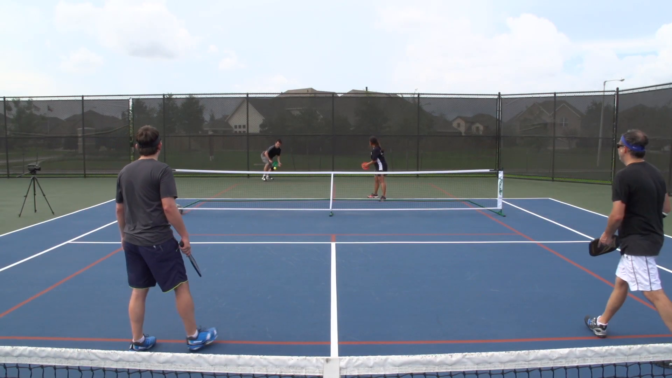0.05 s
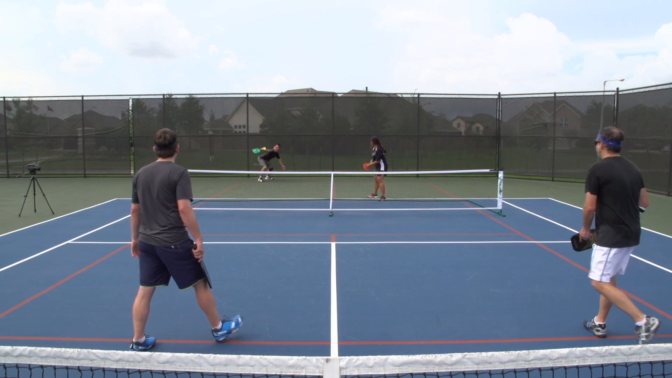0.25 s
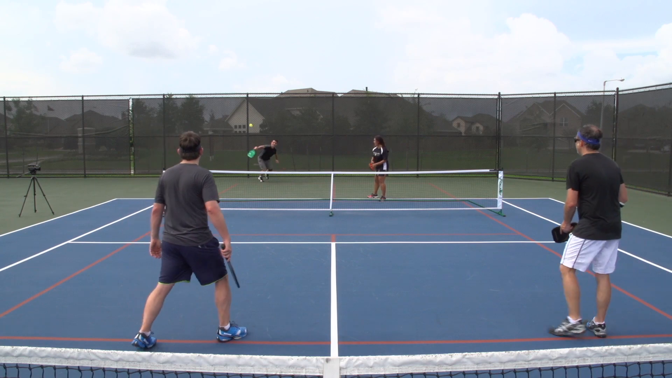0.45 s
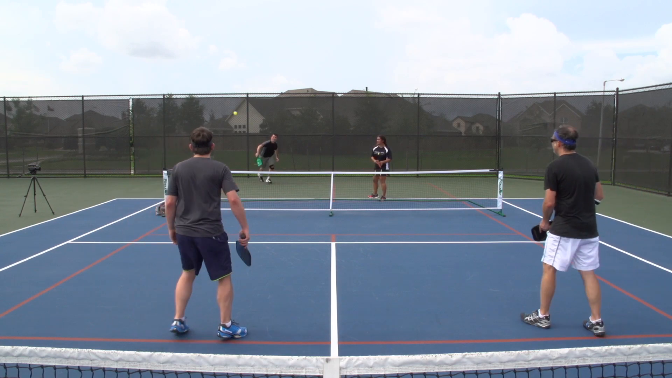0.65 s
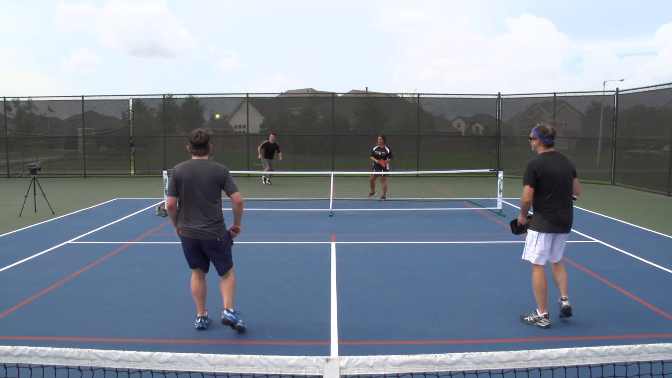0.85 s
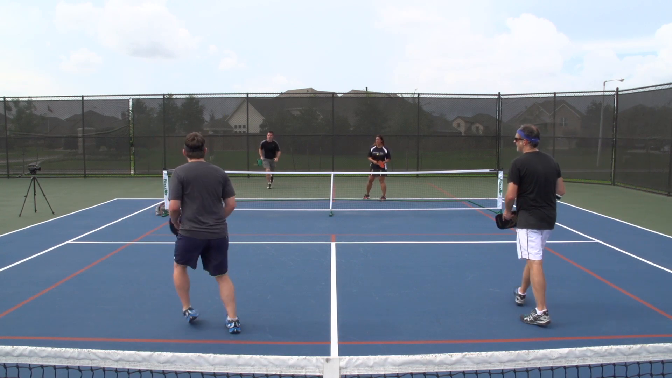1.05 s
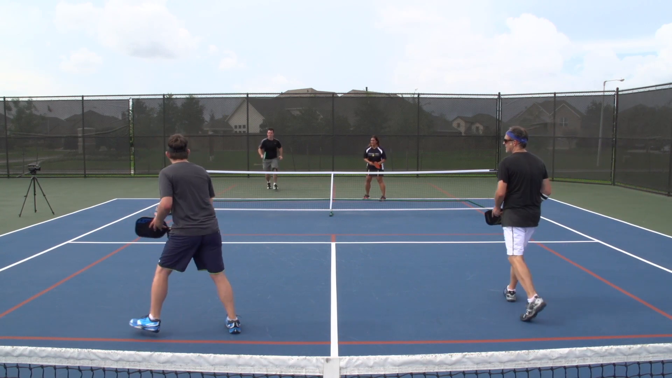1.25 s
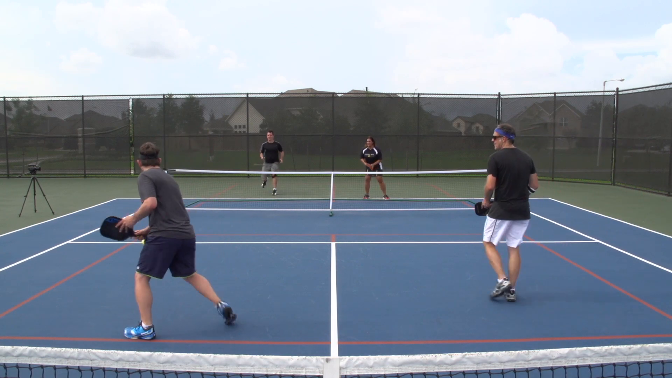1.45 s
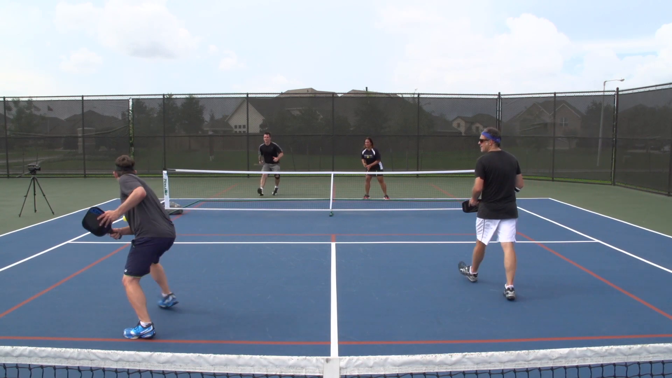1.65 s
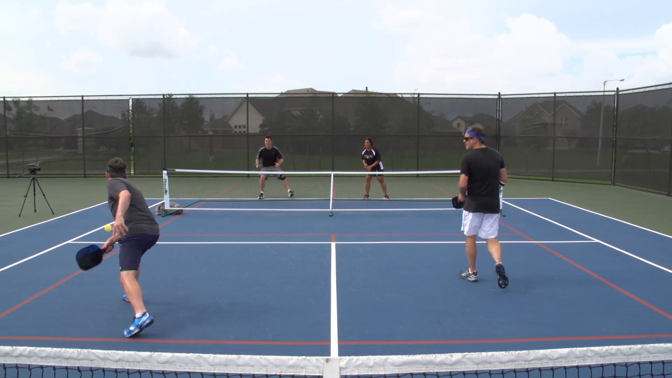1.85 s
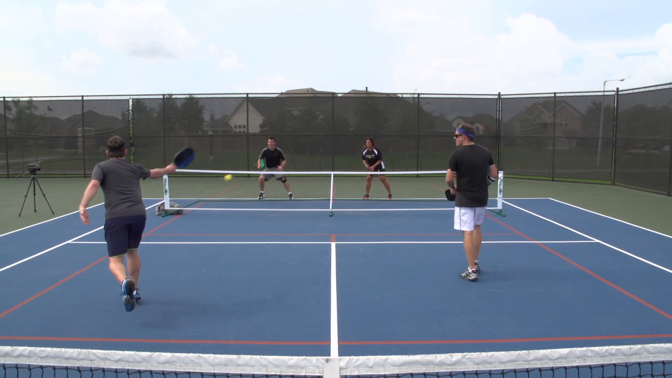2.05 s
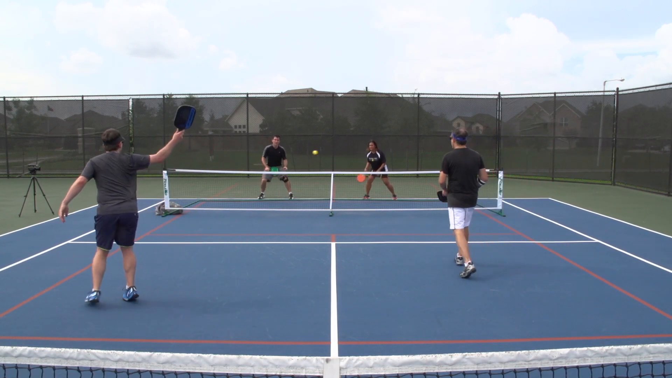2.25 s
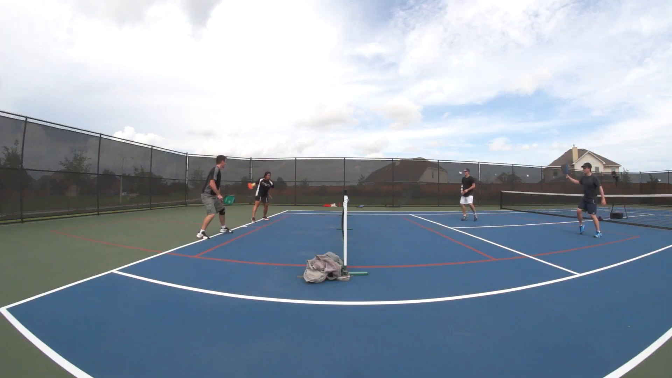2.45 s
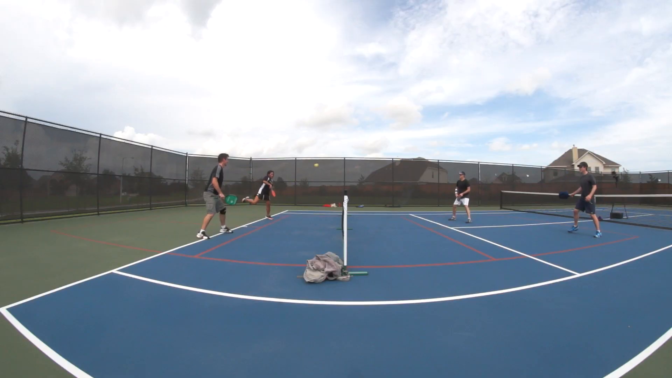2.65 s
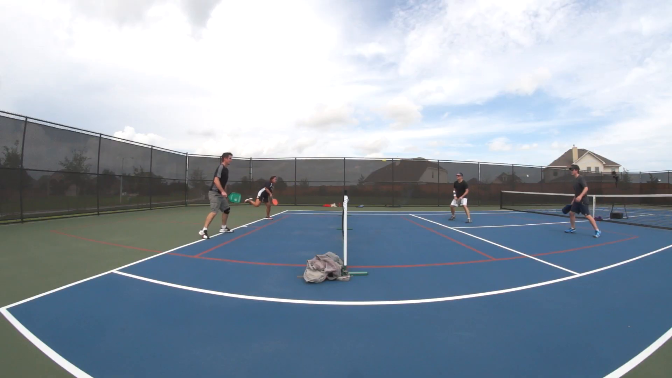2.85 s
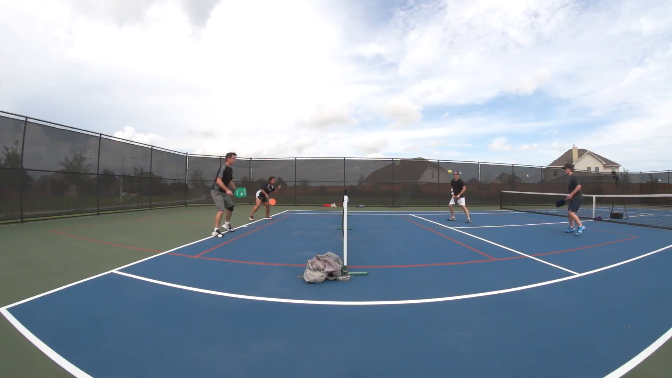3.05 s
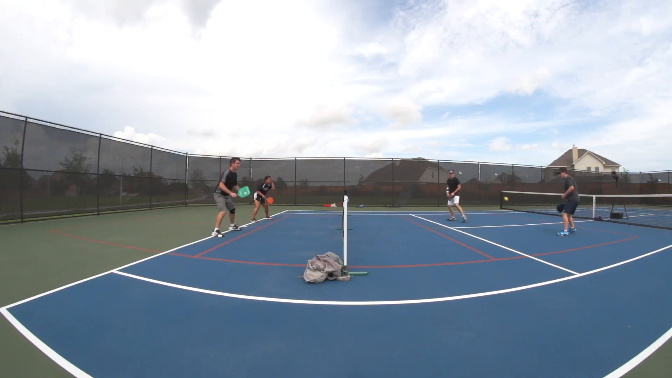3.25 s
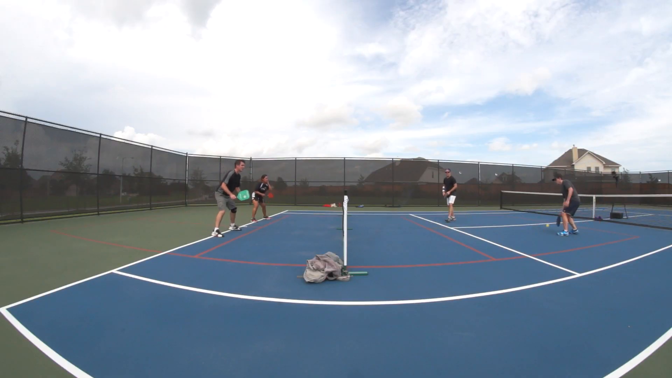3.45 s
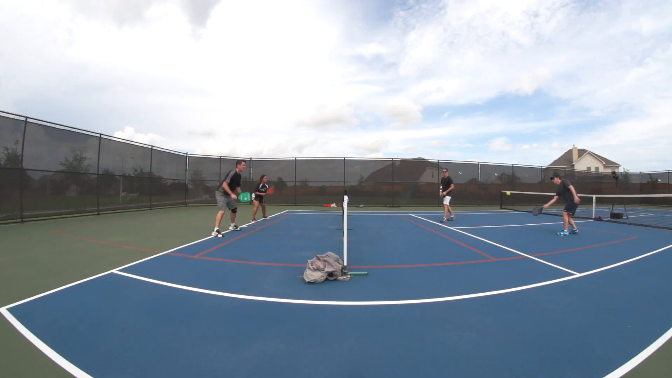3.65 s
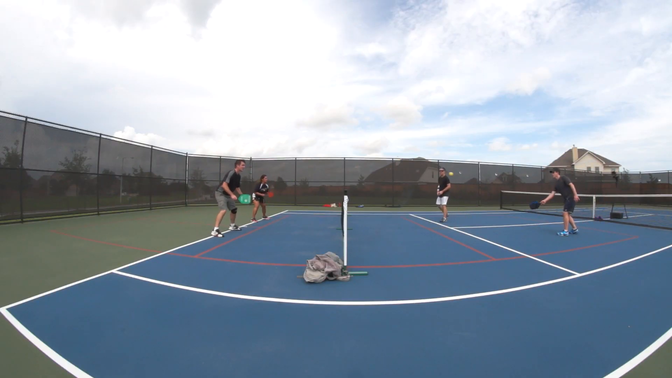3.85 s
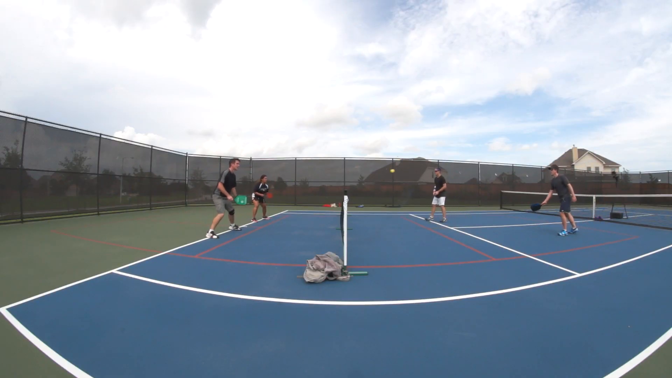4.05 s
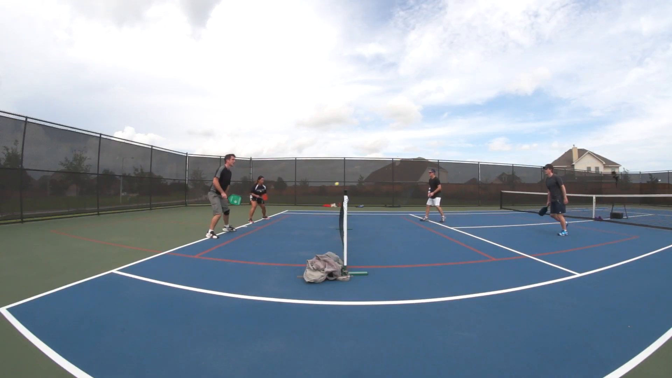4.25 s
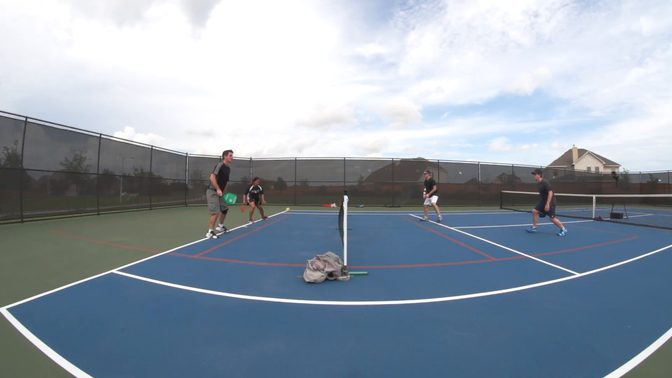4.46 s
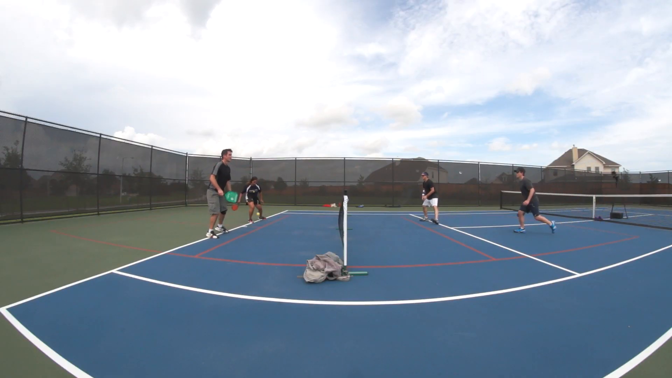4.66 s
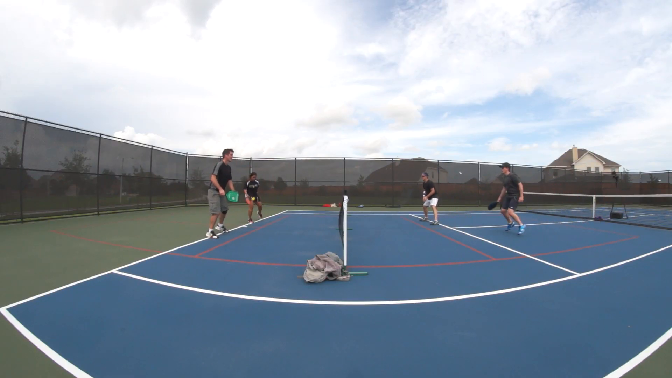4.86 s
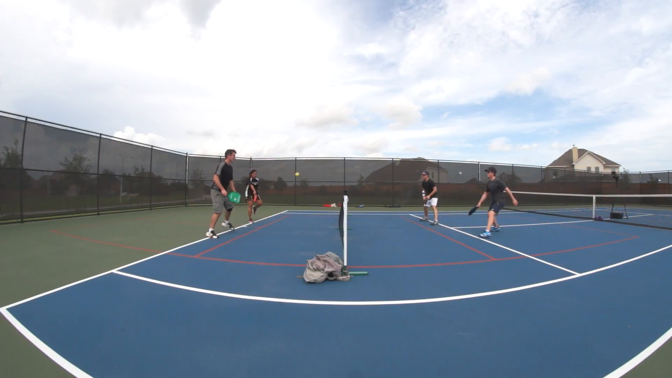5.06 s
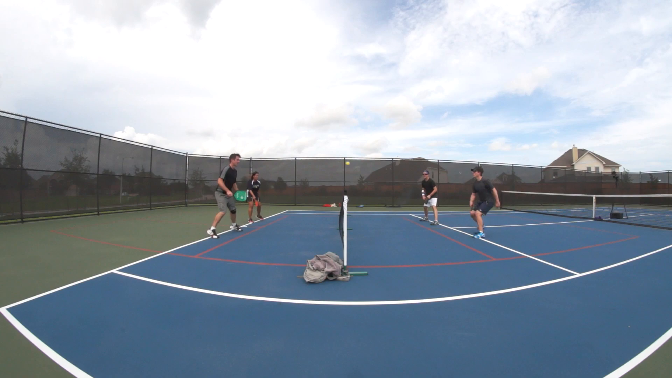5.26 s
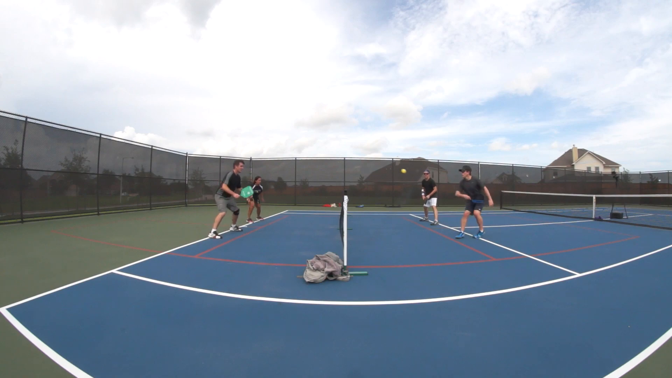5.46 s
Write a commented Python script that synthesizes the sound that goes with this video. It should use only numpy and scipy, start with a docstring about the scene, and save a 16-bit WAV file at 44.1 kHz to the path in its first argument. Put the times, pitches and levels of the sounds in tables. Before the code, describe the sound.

A pickleball rally heard outdoors on a stereo microphone exposed to the wind. One early pop, then a low bounce and shoe scrapes, a bright loud crack near two seconds, then three more pops of varying strength, the last much softer. Short squeaks and scuffs fill the gaps, loudest just after the last shot. Fences return weak echoes above distant traffic and soft hiss.

```python
"""Paddles pop a hollow ball in a pickleball rally on an outdoor hard court: each shot is one push of air,
the brief ring of the paddle face, and a crack of the shell made from decaying modes and a noise burst.
Between the shots, shoes and bounces tap as short decaying tones, soles scuff as grainy noise and squeak
as wavering stick-slip tones, and something brushes softly. Fences and houses return faint echoes.
Wind rumbles on a two-port microphone as gusty low noise, over far traffic, a faint tone and hiss."""
import sys
import numpy as np
from scipy import signal
from scipy.fft import rfft, irfft, next_fast_len
from scipy.io import wavfile
from scipy.ndimage import uniform_filter1d

SR = 44100
rng = np.random.default_rng(int(sys.argv[2]) if len(sys.argv) > 2 else 0)


def bounce(signal):
    """Save signal as a 16-bit WAV file at the path given by the first command-line argument."""
    frames = np.transpose(np.atleast_2d(signal))
    limited = np.clip(frames, -1, 1)
    pcm = np.round(limited * 32767).astype(np.int16)
    wavfile.write(sys.argv[1], SR, pcm)


N = 242805
TIME = np.arange(N) / SR
BLOW = TIME[:SR // 4]  # time base of one struck or scuffed sound
SIDES = np.array([[1], [-1]])  # left, right


def undb(db):
    """Decibels to gain."""
    return 10 ** (np.asarray(db) / 20)


def unit(x):
    """Scale to rms 1."""
    return x / np.sqrt(np.mean(x ** 2))


def noise(points, size):
    """Noise of rms 1 with the colour of (Hz, dB) points."""
    hz, db = np.transpose(points)
    count = next_fast_len(size)
    f = np.maximum(np.fft.rfftfreq(count, 1 / SR), 1)
    colour = undb(np.interp(np.log(f), np.log(hz), db))
    return unit(irfft(rfft(rng.standard_normal(count)) * colour, count)[:size])


def walk(rate, size):
    """Random wander: `rate` normal draws a second, joined by straight lines."""
    return np.interp(TIME[:size] * rate + rng.random(), np.arange(size), rng.standard_normal(size))


def lowpass(x, hz):
    """Gentle loss of treble."""
    return signal.sosfilt(signal.butter(1, min(hz, .45 * SR), fs=SR, output="sos"), x)


def mode(hz, db, t60):
    """One struck resonance, a sine that falls 60 dB in t60 seconds."""
    return undb(db - 60 * BLOW / t60) * np.sin(2 * np.pi * hz * BLOW)


def fade(t, t60):
    """Exponential decay by 60 dB in t60 seconds."""
    return np.exp(-np.log(1000) * t / t60)


def delayed(x, s):
    """The same sound s seconds later."""
    t = TIME[:len(x)]
    return np.interp(t - s, t, x, left=0)


def add(out, s, sound, pan_db=0):
    """Mix a sound into both channels at time s, the left pan_db above the right."""
    start = max(int(s * SR), 0)
    sound = sound[:N - start]
    out[:, start:start + len(sound)] += undb(SIDES * pan_db / 2) * sound


# Paddle shots on the court. Each row: start in seconds, shove in Hz, shove level in dB, face mode in Hz,
# its level in dB, its t60 in seconds, second mode in Hz, its level in dB, shell level in dB, crack level
# in dB, ground bounce lag in seconds, near fence delay in seconds, its level in dB, far fence delay in
# seconds, its level in dB, left minus right in dB, extra level of the sound leaving sideways in dB.
PADDLE_SHOTS = [(0.2728, 600, -17, 1241, -12.5, 0.054, 1200, -25, -42, -26, .00085, 0.027, -27, 0.1217, -24, -3.5, 6.5),
                (2.0321, 411, -17, 1078, -6, 0.015, 1423, -5, -11, -9, .0031, 0.047, -28, 0.12, -29, 1.3, -1),
                (2.6046, 493, -28.5, 1055, -12, 0.021, 1280, -20, -44, -20.5, .0030, 0.034, -18, 0.1104, -27.5, -4, 1),
                (3.6256, 512, -10.5, 1536, -13.5, 0.03, 1670, -35.5, -24.5, -22, .00227, 0.038, -26.5, .1275, -28.5, -2, 0),
                (4.9750, 439.5, -25.5, 1599, -26.5, .019, 1136, -32, -40, -38, .0018, 0.0403, -18.5, 0.112, -26, -3.5, 1)]
# Modes of the ball's shell. Each row: pitch in Hz, level in dB relative to the shot's shell level,
# t60 in seconds.
SHELL_MODES = [(2060, -12.5, .012), (2880, -8.5, 0.016), (3224, 0, 0.011), (4382, -4, .012),
               (5110, -6.5, 0.016), (7500, -13, .008)]


def shots(sideways, second_t60=0.018, ground=0.25, fence_hz=3500):
    """The paddle shoves the air, its face rings like a drum, and the ball's shell cracks."""
    out = np.zeros((2, N))
    shell = sum(mode(hz, db, t60) for hz, db, t60 in SHELL_MODES)
    for s, shove_hz, shove_db, face_hz, face_db, t60, *rest in PADDLE_SHOTS:
        second_hz, second_db, shell_db, crack_db, *place = rest
        lag, near_s, near_db, far_s, far_db, pan_db, sideways_db = place
        # a single cycle: one push and pull during the contact
        shove = undb(shove_db) * np.sin(2 * np.pi * np.minimum(shove_hz * BLOW, 1))
        face = mode(face_hz, face_db, t60) + mode(second_hz, second_db, second_t60)
        pop = shove + face + undb(shell_db) * shell + undb(crack_db) * crack()
        pop = pop + ground * delayed(pop, lag)  # the hard court mirrors it
        slaps = undb(near_db) * delayed(pop, near_s) + undb(far_db) * delayed(pop, far_s)
        heard = pop + lowpass(slaps, fence_hz)
        add(out, s, undb(sideways * sideways_db) * heard, pan_db)
    return out


# Colour of a hard contact. Each row: frequency in Hz, relative level in dB per Hz.
CRACK_COLOUR = [(300, -23), (1200, -0.5), (2800, -3), (5000, -5.5), (9000, -9), (12000, -13.5),
                (16000, -20)]


def crack(t60=0.0071, contact_s=0.00087, tail_db=-22, tail_t60=0.11, patchy_db=5):
    """A bright burst holds for the contact and decays, over its patchy scatter off the ground."""
    size = len(BLOW)
    burst = fade(np.maximum(BLOW - contact_s, 0), t60)
    scatter = undb(tail_db + patchy_db * walk(400, size)) * fade(BLOW, tail_t60)
    return noise(CRACK_COLOUR, size) * (burst + scatter)


# Bounces and footfalls on the court. Each row: start in seconds, thud in Hz, thud level in dB,
# knock in Hz, knock level in dB, click level in dB.
COURT_TAPS = [(1.5009, 402, -26.5, 2058, -39, -38.5), (1.5621, 690, -35, 2840, -40, -27.5),
              (1.5651, 252, -13.5, 692, -20.5, -36.5), (2.7770, 220, -27.5, 600, -55, -40.5),
              (2.8910, 402.8, -61.5, 2513, -51, -50.5), (3.5586, 460.7, -30, 1943, -36.5, -32.5),
              (4.7110, 400, -41, 2090, -41, -38), (5, 402, -54, 2562, -61.5, -49),
              (5.043, 302.5, -39, 783, -38, -34)]


def taps(thud_t60=0.0091, knock_t60=0.013, pan_db=-3.0):
    """Dead, short blows on the hard court: two quickly damped modes and a click."""
    out = np.zeros((2, N))
    for s, thud_hz, thud_db, knock_hz, knock_db, click_db in COURT_TAPS:
        thud = mode(thud_hz, thud_db, thud_t60)
        knock = mode(knock_hz, knock_db, knock_t60)
        click = undb(click_db) * crack(t60=0.0087, contact_s=.0003)
        add(out, s, thud + knock + click, pan_db)
    return out


# Soles dragging over the gritty paint. Each row: start in seconds, length in seconds,
# level in dB before the weight shapes it, reference frequency of the colour in Hz.
SOLE_SCUFFS = [(0.488, 0.17, -58.5, 1670), (0.620, 0.08, -49, 8100), (0.799, 0.027, -36, 4050),
               (0.820, 0.054, -39.5, 3450), (0.949, 0.018, -47.5, 8140), (1.005, 0.057, -36.2, 4284),
               (1.131, 0.029, -55.5, 5920), (1.821, 0.092, -42.5, 3520), (2.403, 0.052, -45.5, 4512),
               (2.59, 0.067, -48, 5030), (2.703, 0.011, -53, 5990), (2.720, 0.061, -37.5, 4460),
               (3.127, 0.034, -52, 4500), (3.26, 0.083, -49, 4460), (3.369, 0.13, -53.5, 4500),
               (3.424, 0.046, -47, 3950), (4.657, 0.041, -52, 8000), (4.697, 0.056, -59.5, 5050),
               (4.874, 0.053, -61, 6000), (4.938, 0.018, -53.5, 6005), (5.042, 0.04, -29, 4030),
               (5.221, 0.049, -46.5, 3950)]
# Colour of the grit. Each row: multiple of the reference frequency, relative level in dB per Hz.
GRIT_COLOUR = [(0.1, -22), (.25, -12), (.5, -2), (1, -3.5), (1.999, -8.5), (3, -14.5), (5, -32)]


def scuffs(grain_db=3, catch_db=2, swell=0.74, tread_db=2.5, trail_db=-16, trail_t60=.17, pan_db=-1.5):
    """A sole rasps over grit, catching and letting go under its weight; loose grit rolls on after."""
    out = np.zeros((2, N))
    multiple, colour = np.transpose(GRIT_COLOUR)
    bands = np.geomspace(multiple[0], multiple[-1], 40)
    size = len(BLOW)
    trail = fade(BLOW, trail_t60)
    for s, length, db, reference_hz in SOLE_SCUFFS:
        tread = np.interp(np.log(bands), np.log(multiple), colour)
        tread = tread + tread_db * rng.standard_normal(len(bands))  # each step rings differently
        rasp = noise(np.column_stack([reference_hz * bands, tread]), size)
        grip = undb(grain_db * walk(2000, size) + catch_db * walk(200, size))
        weight = np.abs(np.sin(np.pi * np.minimum(BLOW / length, 1))) ** swell
        rolling = undb(trail_db) * signal.fftconvolve(weight, trail / trail.sum())[:size]
        add(out, s, undb(db) * unit(rasp * grip) * np.hypot(weight, rolling), pan_db)
    return out


# Rubber soles squeaking. Each row: start in seconds, length in seconds, pitch in Hz,
# glide as a share of the pitch, level in dB before the soft edges, roughness (0 smooth, 1 rough).
SOLE_SQUEAKS = [(0.805, 0.011, 2207, -0.093, -39.5, 0.49), (0.838, 0.027, 1509, 0.023, -30, 0.42),
                (1.032, 0.027, 2204, -0.072, -42, 0.7), (1.036, .016, 3068, -0.049, -48, 1.19),
                (1.877, 0.033, 1633, -0.282, -40.5, 0.78), (2.422, 0.016, 2973, -0.097, -37, 0.1),
                (2.426, 0.011, 2346, -0.029, -37, 0.85), (2.732, 0.027, 2445, 0.047, -28, 0.42),
                (2.763, 0.017, 2586, -0.048, -24, 0.04), (3.146, 0.013, 2927, -0.083, -49, 0.36),
                (3.283, 0.0127, 2880, -0.056, -41.5, 0.24), (3.287, 0.0894, 2355, -.01, -50.5, 0.36),
                (3.313, 0.0167, 2890, 0.011, -49, 0.31), (3.442, 0.014, 1988, -0.005, -36.5, 0.4),
                (3.452, 0.026, 1880, 0.048, -45.5, 0.4), (5.044, 0.031, 2627, 0.026, -21.5, 0.5),
                (5.067, .012, 2103, 0.027, -21.5, 0.37), (5.235, 0.019, 2272, 0.21, -36.5, 0.33)]


def squeaks(jitter=0.12, flutter_db=6, overtone_db=-6, edge=0.58, bite=0.43, pan_db=-2.5):
    """Rubber sticks and slips; a rough slide wavers more and has stronger overtones."""
    out = np.zeros((2, N))
    loudest_db = max(row[4] for row in SOLE_SQUEAKS)
    for s, length, hz, glide, db, rough in SOLE_SQUEAKS:
        size = int(length * SR)
        waver = walk(1300, size)
        bend = glide * np.linspace(-.5, .5, size)
        pitch = hz * (1 + bend + jitter * rough * (waver - waver.mean()))
        phase = 2 * np.pi * np.cumsum(pitch) / SR
        # light slides are nearly pure
        fall = undb(overtone_db + bite * (db - loudest_db)) * np.sqrt(abs(rough))
        slip = sum(fall ** k * np.sin((k + 1) * phase) for k in range(4))
        grip = undb(flutter_db * rough * walk(500, size))
        add(out, s, undb(db) * unit(slip * grip) * signal.windows.tukey(size, edge), pan_db)
    return out


def resonant(hz, size, q):
    """Noise of rms 1 in one broad resonance."""
    peak = signal.iirpeak(min(hz, .45 * SR), q, fs=SR)
    return unit(signal.lfilter(*peak, rng.standard_normal(size)))


# Long soft swishes. Each row: start in seconds, length in seconds, level in dB before the swell,
# lower resonance in Hz, upper resonance in Hz.
SOFT_SWISHES = [(0.45, 0.17, -66, 3400, 7300), (0.671, 0.11, -66, 3500, 3900),
                (4.228, 0.29, -61, 5640, 7720), (4.421, 0.38, -68, 3890, 5600)]


def swishes(q=3.5, flutter_db=1.0, pan_db=-2.0):
    """Soft brushing, like a sliding shoe or moving clothes: swelling noise in two resonances."""
    out = np.zeros((2, N))
    for s, length, db, lower_hz, upper_hz in SOFT_SWISHES:
        size = int(length * SR)
        brush = unit(resonant(lower_hz, size, q) + resonant(upper_hz, size, q))
        level = undb(db + flutter_db * walk(61, size))
        add(out, s, brush * level * signal.windows.cosine(size), pan_db)
    return out


def players(sideways, radiate_hz=115):
    """All that paddles, ball and shoes send towards the microphone, or sideways; little of it is bass."""
    play = shots(sideways) + taps() + scuffs() + swishes() + squeaks()
    return signal.sosfilt(signal.butter(2, radiate_hz, "high", fs=SR, output="sos"), play)


# Echoes from the net, fences and houses. Each row: delay at the microphone in seconds,
# level in dB before the treble loss.
COURT_ECHOES = [(0.011, -28.5), (0.043, -32.5), (0.0828, -35), (.128, -37), (.245, -46), (0.451, -41.5)]


def court(dry, sideways, echo_hz=5000, near_db=-26, near_t60=0.38, far_db=-36, far_t60=1.4, patchy_db=5):
    """Distinct echoes, an uneven scatter from the fences and a long dull one from the houses."""
    echoes = np.zeros(SR)
    for delay, db in COURT_ECHOES:
        echoes[int(delay * SR)] += undb(db)
    out = signal.fftconvolve(dry, lowpass(echoes, echo_hz)[None], axes=1)
    t = TIME[:SR]
    onset = 1 - np.exp(-t / .008)
    # scatter colours as (Hz, relative dB per Hz)
    fences = [(150, -8.5), (1000, -4.5), (2000, 1), (4500, 2.0), (15000, -8)]
    houses = [(200, -17.5), (950, -7), (1300, -0.5), (2600, -9), (5000, -3.5), (12000, -19.0)]
    for sound in (dry, sideways):
        near = noise(fences, SR) * fade(t, near_t60) * undb(patchy_db * walk(250, SR))
        far = noise(houses, SR) * fade(t, far_t60) * undb(patchy_db * walk(74, SR))
        scatter = undb(near_db) * unit(near) + undb(far_db) * unit(far)
        scatter = scatter * onset / np.sqrt(2 * SR)
        out = out + signal.fftconvolve(sound, scatter[None], axes=1)
    return out[:, :N]


# Colour of the wind at the microphone. Each row: frequency in Hz, relative level in dB per Hz.
WIND_COLOUR = [(15, -2), (28, 3), (45, -5.5), (70, -8), (100, -19.5), (150, -27), (300, -45), (800, -86)]
# Strength of the wind at the microphone. Each row: time in seconds, level in dB before gain_db.
WIND_GUSTS = [(0.0, -41), (0.03, -32.5), (0.57, -41.5), (0.7, -36), (0.84, -44.5), (1.03, -25), (1.2, -49),
              (1.35, -41), (1.9, -52), (2.16, -43), (2.36, -56), (2.76, -44), (2.9, -53), (3.34, -48),
              (3.4, -59), (4.11, -45.5), (4.19, -54), (4.66, -39), (4.75, -47.5), (5.32, -51),
              (5.43, -28.5), (5.51, -41)]


def wind(gain_db=5, shared=0.18, split_hz=55, small_db=-2, growth=0.3, buffets_per_s=14, buffet_db=1.5):
    """Gusts buffet the two microphone ports, partly together; strong ones shed more small eddies."""
    # quick turbulence rides on the slower gusts
    gust_db = np.interp(TIME, *np.transpose(WIND_GUSTS)) + buffet_db * walk(buffets_per_s, N)
    ports = np.array([noise(WIND_COLOUR, N) for _ in range(2)])
    eddies = np.sqrt(shared) * noise(WIND_COLOUR, N) + np.sqrt(1 - shared) * ports
    # even out the eddies, so that the gusts set the strength
    eddies /= np.sqrt(uniform_filter1d(np.mean(eddies ** 2, axis=0), size=4000))
    large = signal.sosfiltfilt(signal.butter(2, split_hz, fs=SR, output="sos"), eddies)
    small = (eddies - large) * undb(small_db + growth * (gust_db - gust_db.mean()))
    return undb(gust_db + gain_db) * (large + small)


# Colour of the far traffic. Each row: frequency in Hz, relative level in dB per Hz.
TRAFFIC_COLOUR = [(40, 1.5), (100, -3.5), (170, 0.5), (300, -8), (600, -18), (1200, -26), (3000, -38),
                  (8000, -59.5)]
# Colour of the microphone's hiss. Each row: frequency in Hz, relative level in dB per Hz.
HISS_COLOUR = [(300, 1.5), (1500, 4), (3000, 0), (6000, -6), (9300, -6.5), (10000, -1), (10500, 9.5),
               (11100, -5.5), (12000, -13.5), (16000, -10)]
# Faint far tone. Each row: time in seconds, level in dB about which it wavers.
FAR_TONE = [(0, -74), (.05, -62.5), (.25, -75.5), (.6, -67.5), (.95, -67), (1.5, -78.5), (2.4, -84),
            (5.5, -86)]


def background(traffic_db=-55, side_db=-13, hiss_db=-68, hiss_side_db=-9, whine_hz=1453, pan_db=-2.0):
    """Far traffic and the microphone's own hiss as coloured noise, and a faint wavering sine."""
    traffic_level = undb(traffic_db + walk(9.7, N) + SIDES * pan_db / 2)
    # noise of opposite sign in the two channels widens the sound
    traffic = noise(TRAFFIC_COLOUR, N) + undb(side_db) * SIDES * noise(TRAFFIC_COLOUR, N)
    hiss = noise(HISS_COLOUR, N) + undb(hiss_side_db) * SIDES * noise(HISS_COLOUR, N)
    pitch = whine_hz + 8 * walk(40, N)
    tone = unit(np.sin(2 * np.pi * np.cumsum(pitch) / SR))
    tone_level = undb(np.interp(TIME, *np.transpose(FAR_TONE)) + 2 * walk(15, N))
    return traffic_level * traffic + undb(hiss_db) * hiss + tone * tone_level


def scene():
    """The players in the open court, under wind; what leaves them sideways differs in fine detail."""
    play = players(False)
    return play + court(play, players(True)) + wind() + background()


def record(dry, spread_hz=11000, top_hz=16000):
    """The two ports drift apart in phase towards the treble; full scale clips and the top is cut."""
    phase = (np.fft.rfftfreq(N, 1 / SR) / spread_hz) ** 0.87  # radians between the ports
    turn = np.exp(-.5j * phase * SIDES)
    ports = np.clip(irfft(rfft(dry) * turn, N), -1, 1)
    return signal.sosfilt(signal.ellip(8, .2, 70, top_hz, fs=SR, output="sos"), ports)


dry = scene()
out = record(dry)
bounce(out)
```